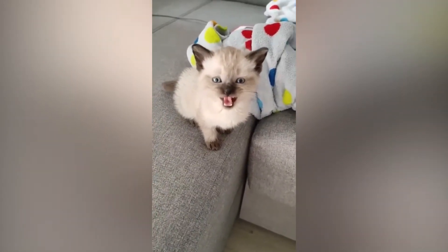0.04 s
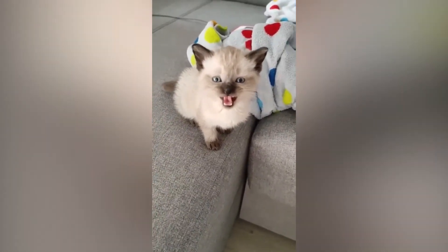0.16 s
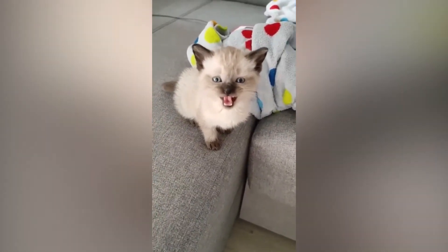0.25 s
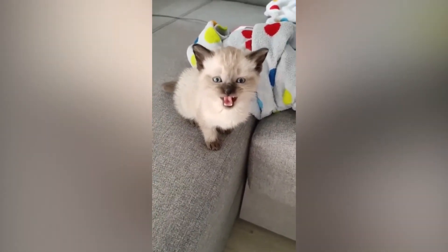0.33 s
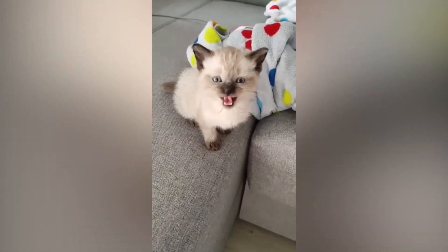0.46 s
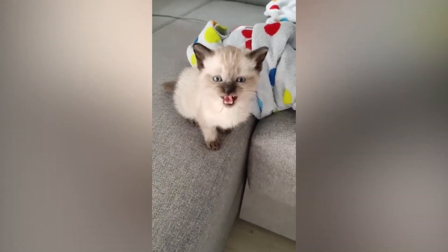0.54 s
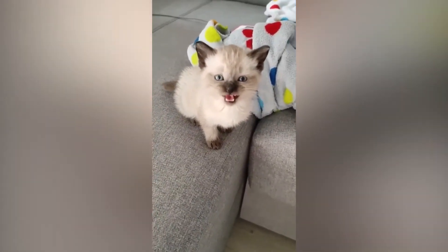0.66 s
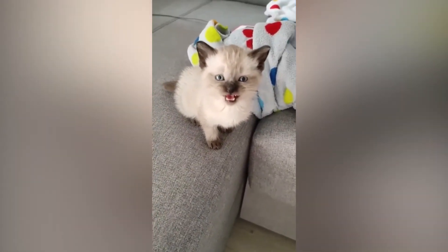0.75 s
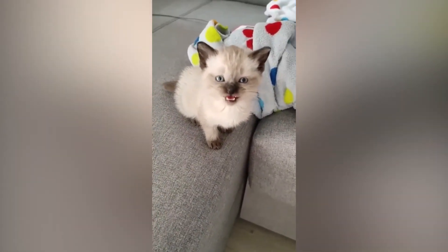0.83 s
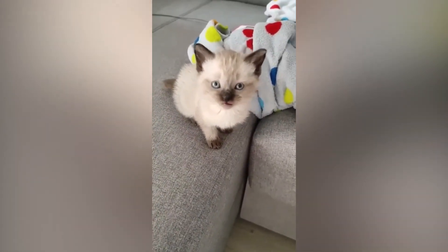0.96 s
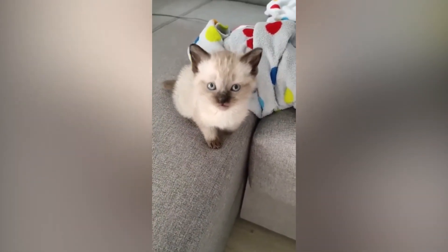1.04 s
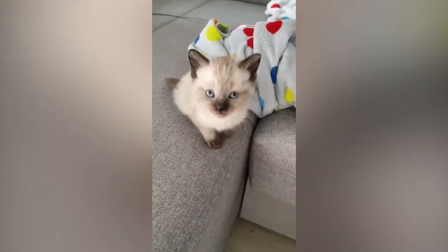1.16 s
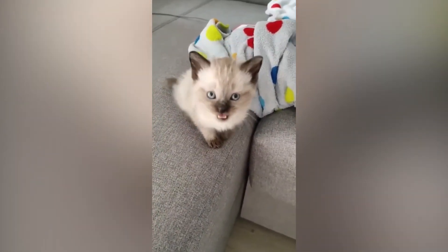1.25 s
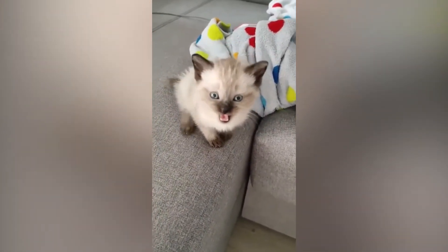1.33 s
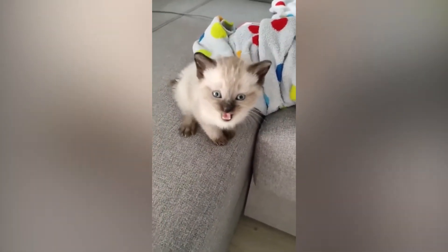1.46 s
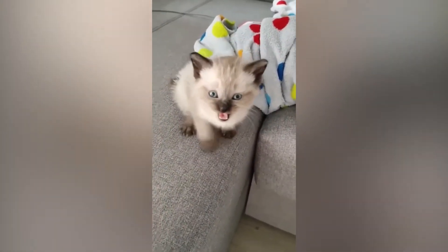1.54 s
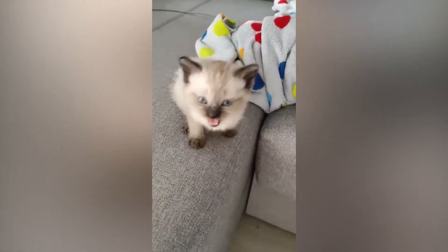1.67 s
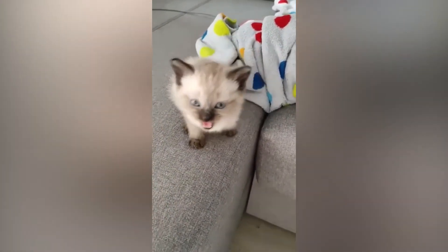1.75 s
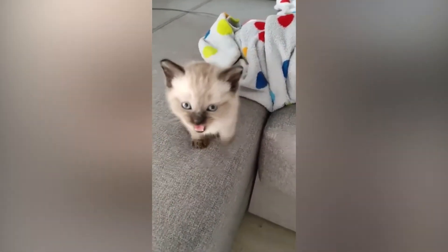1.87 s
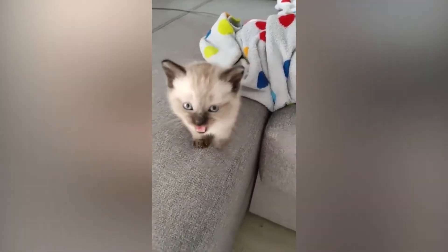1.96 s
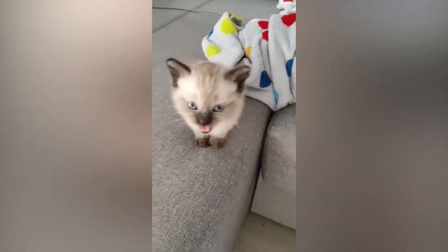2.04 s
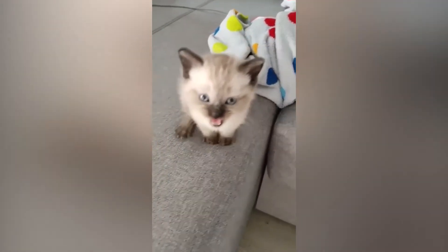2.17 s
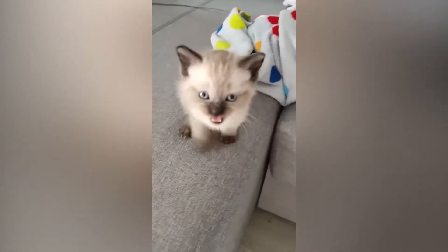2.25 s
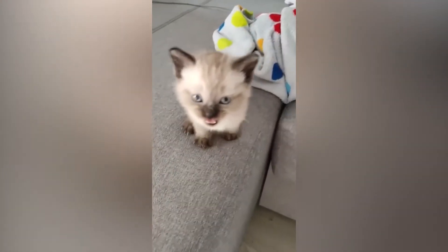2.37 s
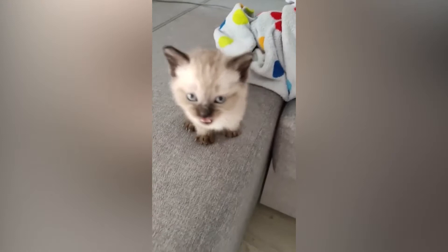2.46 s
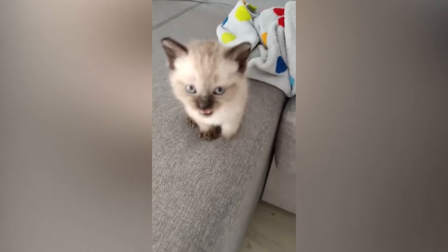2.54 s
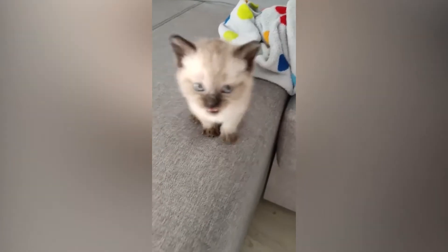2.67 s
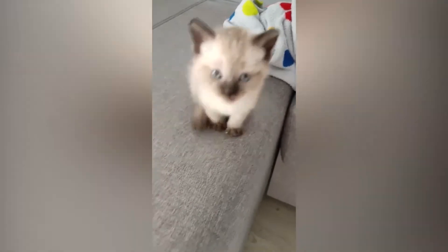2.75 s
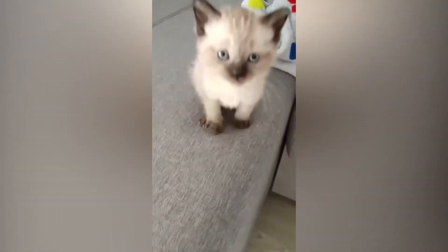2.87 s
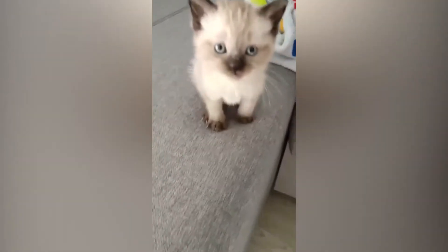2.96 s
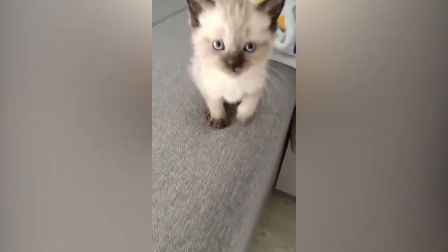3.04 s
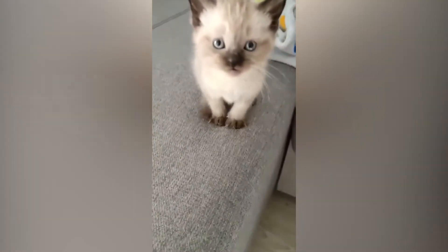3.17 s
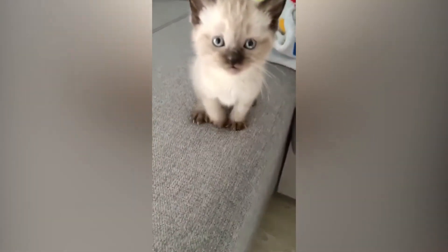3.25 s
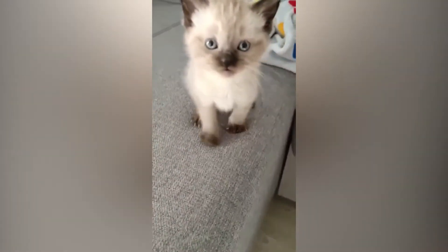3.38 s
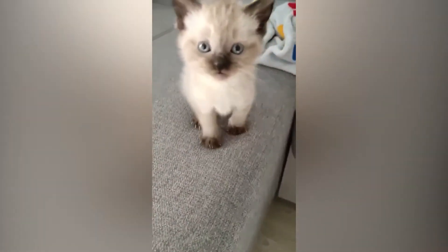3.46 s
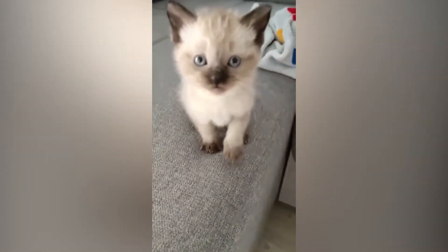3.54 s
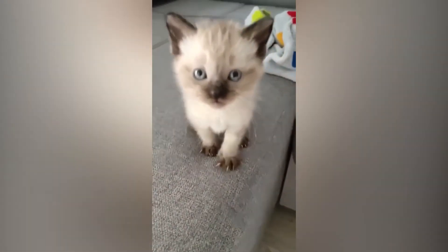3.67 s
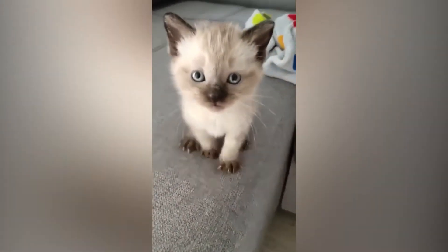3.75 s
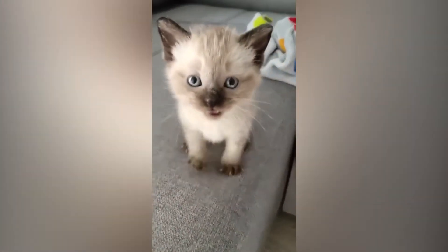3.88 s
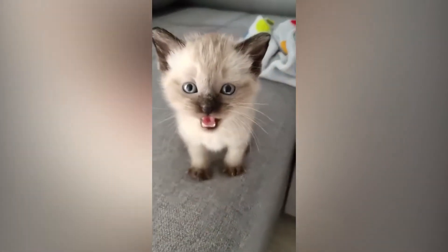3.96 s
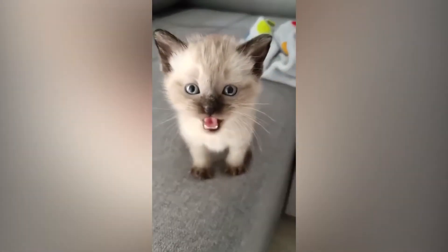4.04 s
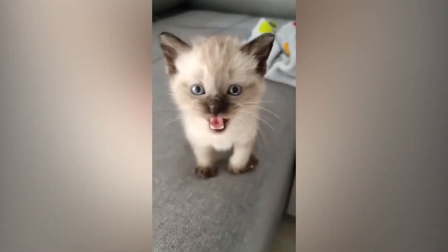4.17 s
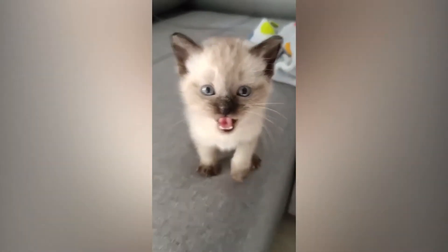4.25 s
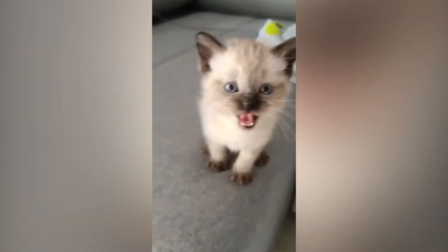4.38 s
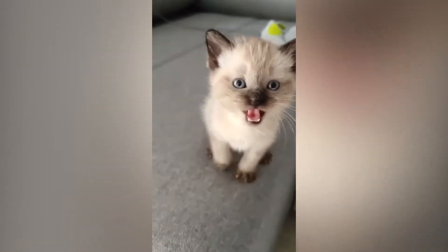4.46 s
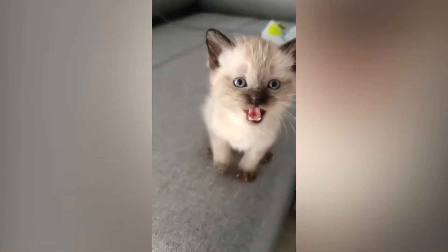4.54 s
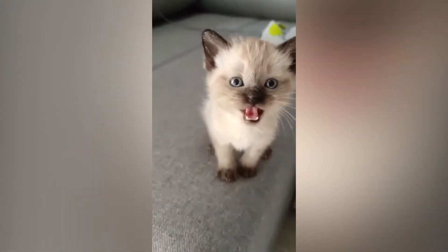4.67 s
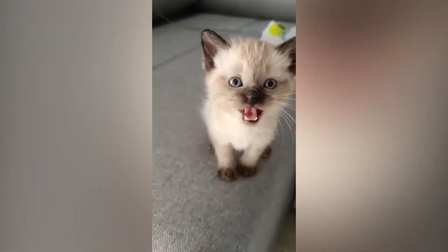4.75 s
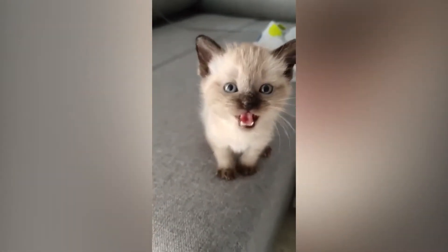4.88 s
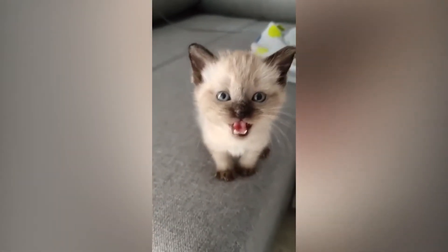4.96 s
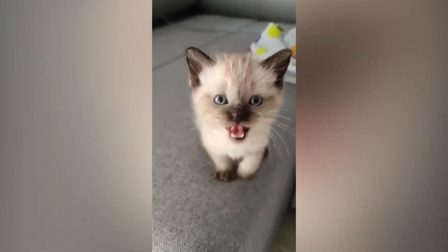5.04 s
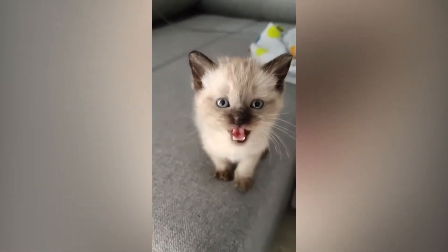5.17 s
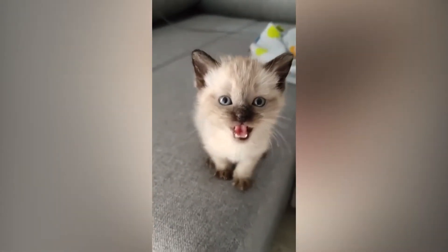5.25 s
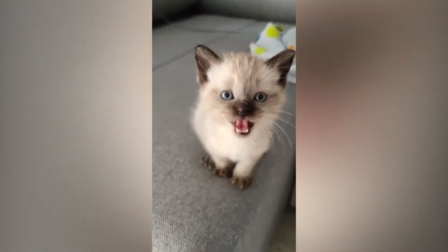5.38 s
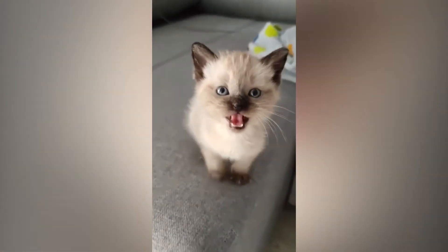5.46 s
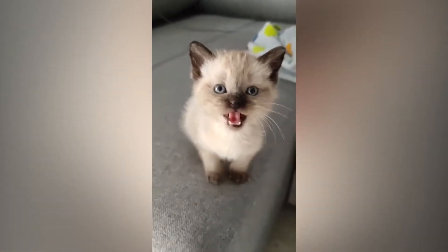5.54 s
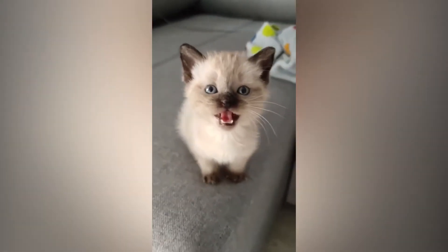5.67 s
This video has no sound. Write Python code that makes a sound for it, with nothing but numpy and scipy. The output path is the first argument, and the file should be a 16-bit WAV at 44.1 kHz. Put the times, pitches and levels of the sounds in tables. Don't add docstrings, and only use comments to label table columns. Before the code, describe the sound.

A kitten is heard close up at half speed in a quiet furnished room, through a small, narrow-sounding microphone. From 0 s a long mew is already sounding, nasal and plaintive, around the pitch of a low human voice's upper range. It swells slightly higher near 1.3 s, softens around 2 s, then sags lower from about 2.4 s, turning hoarse and rattling with a brief dip near 2.75 s. It steadies weakly and trails off around 3.4 s. Faint hiss and soft low rumble from the hand fill the gap. At about 4.15 s a second mew begins abruptly, scooping up to a clearly higher pitch. It is brighter, tighter and mostly clear, with a little roughness near 4.55 s, climbing and growing louder past 5 s and still sounding as it is cut off around 5.6 s. Grainy, artificial treble rides on both cries; the room adds only a short, faint tail.

```python
import sys
import numpy as np
from scipy import signal
from scipy.fft import rfft, irfft, dct, next_fast_len
from scipy.io import wavfile
from scipy.ndimage import uniform_filter1d

SR = 44100
rng = np.random.default_rng(int(sys.argv[2]) if len(sys.argv) > 2 else 0)


def file_out(sig):
    cols = np.atleast_2d(sig).T
    lim = np.clip(cols, -1, 1)
    pcm = np.round(lim * 32767).astype(np.int16)
    wavfile.write(sys.argv[1], SR, pcm)


def invert_db(x):
    u = np.asarray(x, float) / 20
    return 10 ** u


N = 251811
CROSSOVER_HZ, BIN_HZ = 19 * SR / 256, SR / 256


def rms_one(x):
    return x / np.sqrt(np.mean(np.abs(x) ** 2) + 1e-20)


def evened(x):
    return x / np.sqrt(uniform_filter1d(x ** 2, size=2400) + 1e-9)


def in_time(tables):
    s, *columns = np.transpose(np.concatenate(tables))
    return [np.interp(np.arange(N) / SR, s, c) for c in columns]


def at_hz(points, hz):
    f, level = np.transpose(points)
    return invert_db(np.interp(np.log(hz), np.log(f), level, -90, -90))


def coloured(x, points):
    size = next_fast_len(N)
    hz = np.arange(size // 2 + 1) * SR / size + 1e-3
    return irfft(rfft(x, size) * at_hz(points, hz), size)[:N]


def wander(rate_hz):
    r = np.exp(-2 * np.pi * rate_hz * 16 / SR)
    white = rng.standard_normal((2, N // 16 + 502))
    slow = signal.lfilter([1], [1, -2 * r, r * r], white[0] + 1j * white[1])[500:]
    return np.interp(np.arange(N) / 16, np.arange(len(slow)), rms_one(slow))


def peak(hz, centre_hz, width_hz):
    return 1 / (1 + 2j * (hz - centre_hz) / width_hz)


# frequency_hz [Hz], density_db [dB per Hz]
ROOM_HISS = [(60, 4), (150, 10), (320, 5), (600, -1), (1100, -2), (1500, -3), (2800, -5), (3600, -7),
             (4250, -9), (4500, -12), (5200, -10), (7100, -10), (7350, -21), (8100, -22), (8300, -45)]


def room_tone():
    hiss = invert_db(-80) * rms_one(coloured(rng.standard_normal(N), ROOM_HISS))
    treble = signal.butter(4, CROSSOVER_HZ, "high", fs=SR, output="sos")
    top = signal.sosfiltfilt(treble, hiss)
    rumble = coloured(rng.standard_normal(N), [(1, 5.5), (10, -4), (25, -18), (60, -23), (120, -27.0)])
    return hiss - .7 * top * sounding() + invert_db(-68) * rms_one(rumble)


def room(x):
    t60_s, first_echo_s = .35, .008
    t = np.arange(int(.4 * SR)) / SR
    tail = rng.standard_normal(len(t)) * invert_db(-60 * t / t60_s) * (t > first_echo_s)
    return signal.fftconvolve(x, tail / np.sqrt(np.sum(tail ** 2)))[:N]


def sounding():
    t = np.arange(N) / SR
    first = np.exp(-np.clip(t - MEWS[0][-1][0] + 0.016, 0, 1) / 0.021)
    second = np.clip((t - MEWS[1][0][0]) / 0.0068, 0, 1)
    return first + second


def edges(start_s, end_s):
    t = np.arange(N) / SR
    start, end = MEWS[1][0][0], MEWS[0][-1][0]
    before = t < (start + end) / 2
    near_start = np.exp(-(np.clip(t - start, 0, 9) / start_s) ** 2)
    near_end = np.exp(np.clip(t - end, -9, 0) / end_s)
    return ~before * near_start, before * near_end


# peak_s [s], rise_s [s], fall_s [s], pitch_change_hz [Hz], level_change_db [dB]
SWELLS = [(1.298, .68, .52, 54.5, 0), (.92, .2, .1, -3., -0.2), (2.475, .04, .025, -20., -2),
          (2.502, 0.022, 0.022, -0.9, -1.5), (2.544, 0.059, .08, 20.5, 0.8),
          (2.587, 0.082, 0.034, 1.7, -4.5), (2.758, .04, .01, 7, -11.5), (3.2, 0.059, 0.08, -0.2, 2),
          (3.3, 0.048, 0.058, -0.7, -5), (3.387, 0.038, 0.02, -3.5, -0.5), (4.31, 0.046, 0.0075, -0.1, 0),
          (5.268, .22, .14, 24.5, -2), (5.41, .06, .1, -4., -0.2)]


def swells():
    t = np.arange(N) / SR
    shapes = []
    for peak_s, rise_s, fall_s, *_ in SWELLS:
        distance = np.where(t < peak_s, (peak_s - t) / rise_s, (t - peak_s) / fall_s)
        shapes.append(np.cos(np.pi / 2 * np.clip(distance, 0, 1)) ** 2)
    return np.array(SWELLS)[:, 3:].T @ np.array(shapes)


# start_s [s], pitch_hz [Hz]
PITCH = [
    [(0.0, 349.6), (0.33, 333.2), (1.87, 324.4), (2.16, 322.3), (2.42, 294.6), (2.63, 272.1), (2.88, 274.7),
     (3.0, 263.9), (3.4, 261.3)],
    [(4.135, 389.7), (4.35, 401.6), (4.42, 396.6), (4.485, 402.1), (4.55, 420.7), (4.81, 444),
     (5.07, 448.3), (5.52, 430), (5.66, 441.7)],
]


def pitch_line(swell_hz):
    scoop, drop = edges(0.032, .035)
    line = uniform_filter1d(in_time(PITCH)[0], size=2000)
    return uniform_filter1d(line + swell_hz - 57.8 * scoop - 59.97 * drop, size=500)


# start_s [s], roughness [0-1]
HOARSENESS = [
    [(0, .085), (0.85, .1), (1.1, .14), (1.6, .18), (2.1, .27), (2.42, .5), (2.6, .46), (2.72, .26),
     (2.95, .06)],
    [(4.2, .04), (4.47, .045), (4.54, .2), (4.7, .07), (5.0, .04)],
]


def roughness(swell_db):
    rough = in_time(HOARSENESS)[0] + np.dot([.5, .8], edges(.05, .05))
    return np.clip(rough + .04 * np.clip(-swell_db - 1.5, 0, 20), 0, .9)


def folds(pitch, rough):
    phase = 2 * np.pi * np.cumsum(pitch) / SR
    cycle = np.exp(1j * (phase + 0.2 * rough * wander(74).real))
    lean = np.exp(.25j * phase)
    side = np.exp(-.39j * phase)
    partial = invert_db(6 * rough ** 1.5 * wander(140).real)
    for k in range(1, 15):
        partial = partial * cycle
        share = np.clip(rough * np.clip(k * pitch / 2000, .1, 1.15) ** 2.8, 0, .95)
        shimmer = invert_db(3.6 * wander(11.0).real)
        skirt = share * (.8 * wander(40) * lean + 2.0 * rough ** 1.6 * wander(180))
        under = invert_db(-14) * wander(24) * side * (1 < k < 5)
        yield k * pitch, shimmer * (np.sqrt(1 - share ** 2) + skirt + under) * partial


# frequency_hz [Hz], gain_db [dB]
THROAT = [(2200, -12), (2450, -9.5), (2700, -4.5), (3000, -3.5), (3270, -1.5), (3400, -18.5)]


def throat(stack):
    return evened(coloured(stack, THROAT))


# frequency_hz [Hz], gain_db [dB]
CHEST = [(150, -38), (220, 13), (330, -0.5), (450, 1.5), (700, 3.5), (900, 9.5), (1250, 3.5), (1600, -25),
         (2200, -43)]


def chest(stack):
    breath = invert_db(-23) * 3.7 * rng.standard_normal(N)
    return evened(coloured(stack + breath, CHEST))


# frequency_hz [Hz], gain_db [dB]
TOP_LOW = [(3270, -2.5), (3600, 1), (3850, 0), (4150, -12.5), (4350, -9.5), (4500, -36.5)]
TOP_MID = [(4300, -24), (4600, -13.5), (5000, -5), (5400, -6.5), (5750, -1), (5950, -7), (6100, -5)]
TOP_HIGH = [(6000, -19.5), (6250, -13), (6450, 2), (6620, -2), (6750, -38.5)]
TOP_EDGE = [(6550, -33.5), (6700, -10.5), (7100, -4.5), (7250, -18), (7350, -21.5), (7900, -16.5),
            (8100, -28.5)]
TOP_HISS = [-14.5, -11., -6., -8.]
# level_db [dB at strain -50 dB], strain_share [dB per dB], flicker_db [dB]
TOP_LEVELS = [
    (-57.5, 1.36, 2),
    (-74., 0.82, 2.5),
    (-83, 0.23, 5),
    (-94, 0.55, 7),
]


def rebuilt_treble(copies, pitch, rough, strain_db):
    hiss = invert_db(28 * rough - 5.5) * 5.6 * rng.standard_normal(N)
    hiss = hiss * (1 + .6 * np.cos(2 * np.pi * np.cumsum(pitch) / SR))
    shapes = TOP_LOW, TOP_MID, TOP_HIGH, TOP_EDGE
    levellers = evened, evened, rms_one, evened
    total = 0
    for hiss_db, shape, leveller, (level_db, follows, flicker_db) in zip(TOP_HISS, shapes, levellers, TOP_LEVELS):
        part = leveller(coloured(copies + invert_db(hiss_db) * hiss, shape))
        flicker = flicker_db * wander(8.1).real
        total = total + invert_db(level_db + follows * (strain_db + 50) + flicker) * part
    return total


# start_s [s], effort_db [dB], mouth_hz [Hz, resonance], strain_db [dB, throat], pharynx_db [dB]
MEWS = [
    [(0.0, -40, 2197, -50.5, -63), (0.5, -43.5, 2080, -52, -61), (1.08, -41.5, 2270, -50, -65),
     (1.55, -46, 2100, -52, -52.5), (1.95, -54.5, 2122, -55, -52.5), (2.2, -47, 2085, -53.5, -59.5),
     (2.65, -49, 1716, -59, -56), (3.05, -55, 1653, -63, -66), (3.4, -56, 1800, -58, -63.5)],
    [(4.135, -54, 1830, -59.5, -63.5), (4.165, -45, 1925, -49.5, -67), (4.24, -46, 2308, -46.5, -64),
     (4.475, -41, 2347, -46.5, -62.5), (4.62, -41, 2130, -44, -61), (4.8, -38.5, 2266, -44, -58.5),
     (5.07, -36.5, 2253, -43, -58), (5.29, -35.5, 2450, -45, -53.5), (5.5, -35.5, 2100, -46, -55.5)],
]


def kitten():
    swell_hz, swell_db = swells()
    pitch, rough = pitch_line(swell_hz), roughness(swell_db)
    effort_db, mouth_hz, strain_db, pharynx_db = in_time(MEWS)
    chest_db = -63.5 + .25 * (effort_db + 41) + 7.5 * np.log2(pitch / 350)
    chest_db = chest_db + 8 * edges(0.032, .035)[1]
    pitch = pitch + (1.5 + 14 * rough ** 2) * wander(14).real
    t = np.arange(N) / SR
    shifts = [(lowest * BIN_HZ, np.exp(2j * np.pi * shift * BIN_HZ * t))
              for lowest, shift in [(3, 16), (7, 28)]]
    mouth, pharynx, stack, copies = 0, 0, 0, np.zeros(N)
    for hz, partial in folds(pitch, rough):
        kept = np.clip((CROSSOVER_HZ - hz) / 90, 0, 1) * partial
        mouth = mouth + (kept * peak(hz, mouth_hz, 187) * peak(hz, mouth_hz, 1000.0)).real
        pharynx = pharynx + (kept * peak(hz, 1667, 200) ** 3).real
        stack = stack + kept.real
        for lowest_hz, carrier in shifts:
            copies += (kept * carrier).real * (hz > lowest_hz)
    voice = invert_db(effort_db + swell_db - 4.0) * evened(mouth)
    voice = voice + invert_db(pharynx_db + swell_db) * pharynx
    voice = voice + invert_db(strain_db + .5 * swell_db) * throat(stack)
    voice = voice + invert_db(chest_db) * chest(stack)
    return sounding() * (voice + rebuilt_treble(copies, pitch, rough, strain_db))


def scene():
    mew = kitten()
    return (mew + invert_db(-19) * room(mew) + room_tone())[None]


# frequency_hz [Hz], step_db [dB]
CHANNEL_STEP = [(20, -30), (450, -14), (700, -5), (1150, 1), (1500, 2), (2500, 3), (3000, -4), (3400, -24),
                (9000, -44), (13000, -9), (22000, -9)]


def narrow_channel(x, size=4096):
    half, count = size // 2, N // size + 2
    padded = np.pad(x, (size, count * size - N), "reflect")
    window = np.sin(np.pi * (np.arange(2 * size) + .5) / (2 * size))
    frames = np.array([padded[i * size:(i + 2) * size] for i in range(count)]) * window
    a, b, c, d = np.split(frames, 4, axis=1)
    lines = dct(np.hstack([-c[:, ::-1] - d, a - b[:, ::-1]]), type=4, norm="ortho")
    level_db = 10 * np.log10(np.mean(lines[:, 90:] ** 2, axis=1, keepdims=True) + 1e-12)
    sudden = np.diff(level_db, axis=0, prepend=0) > 12
    step = invert_db(-52 + .5 * (level_db + 40) - 40 * sudden)
    step = step * at_hz(CHANNEL_STEP, (np.arange(size) + .5) * SR / 2 / size)
    coarse = np.floor(np.abs(lines / step) ** .75 + .4054)
    back = dct(np.sign(lines) * coarse ** (4 / 3) * step, type=4, norm="ortho")
    p, q = back[:, :half], back[:, half:]
    frames = np.hstack([q, -q[:, ::-1], -p[:, ::-1], -p]) * window
    return (frames[1:, :size] + frames[:-1, size:]).ravel()[:N]


def roll_off(x):
    return signal.sosfilt(signal.butter(12, 15720, fs=SR, output="sos"), x)


def record(dry):
    mirrored = dry * (-1) ** np.arange(N)
    band = signal.cheby2(10, 80, [13900, 16400], "band", fs=SR, output="sos")
    image = invert_db(-2.5) * signal.sosfilt(band, mirrored)
    mix = narrow_channel((dry + image)[0])[None]
    return roll_off(mix)


dry = scene()
out = record(dry)
file_out(out)
```